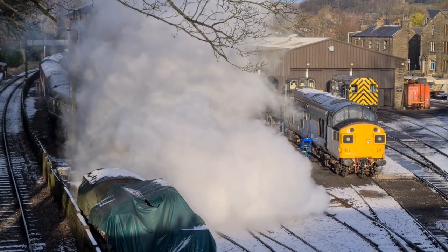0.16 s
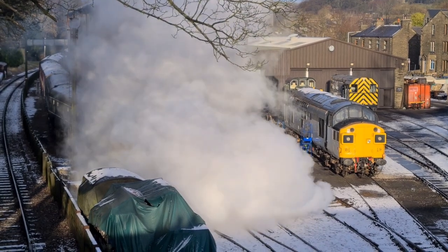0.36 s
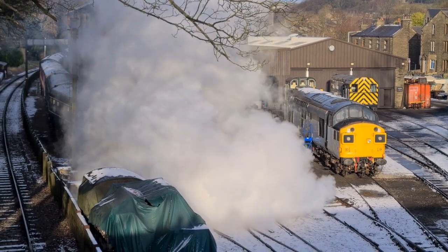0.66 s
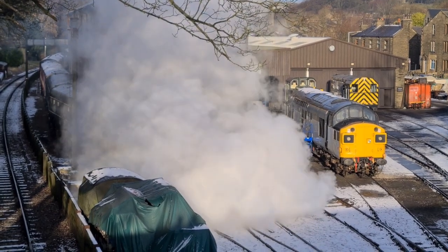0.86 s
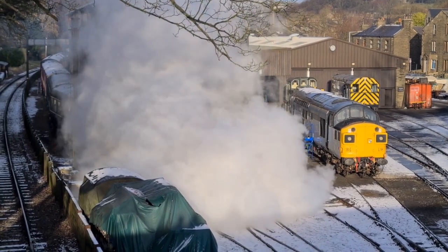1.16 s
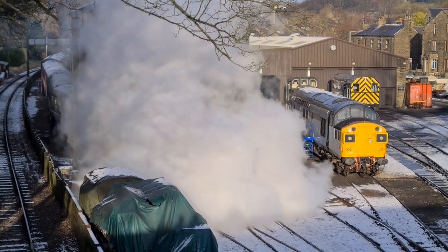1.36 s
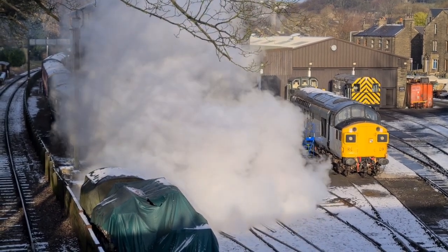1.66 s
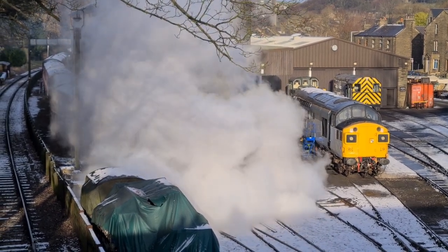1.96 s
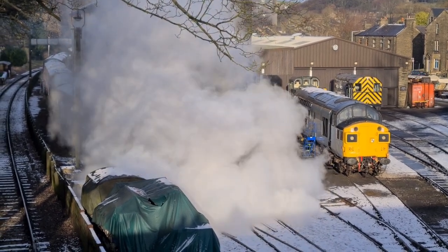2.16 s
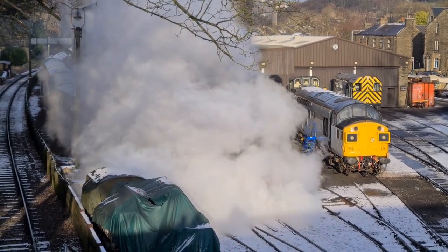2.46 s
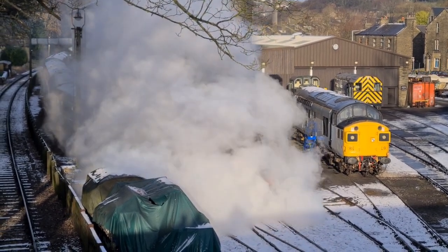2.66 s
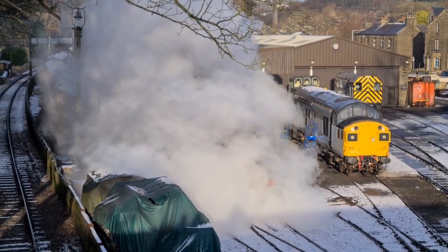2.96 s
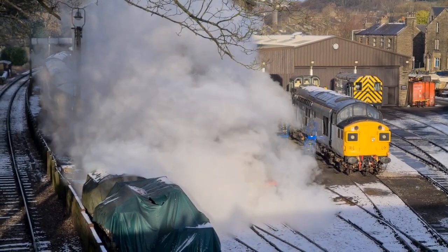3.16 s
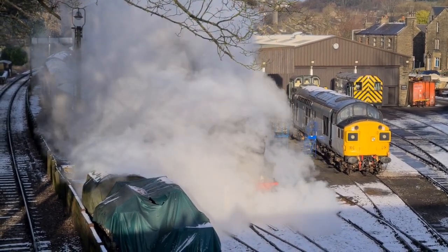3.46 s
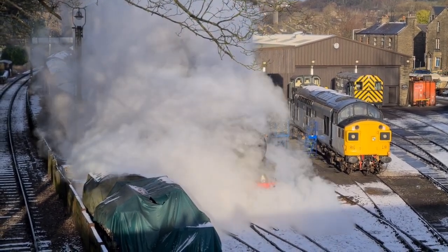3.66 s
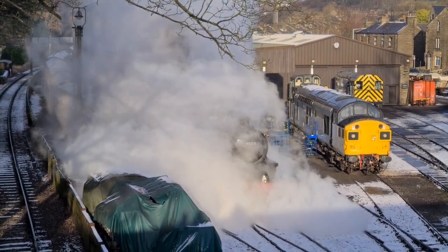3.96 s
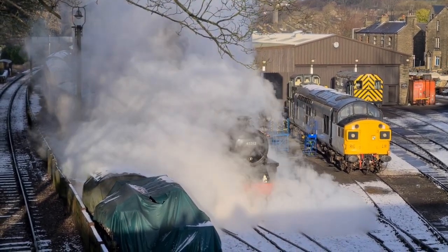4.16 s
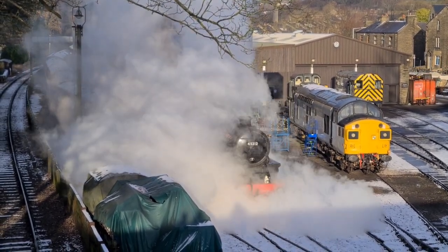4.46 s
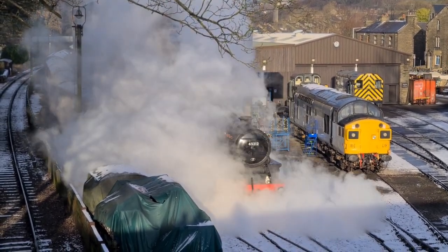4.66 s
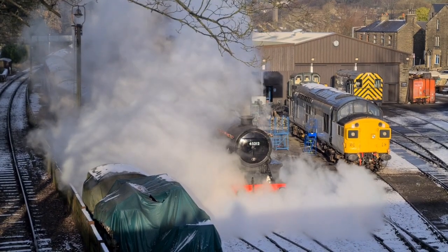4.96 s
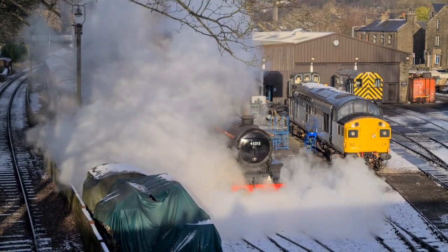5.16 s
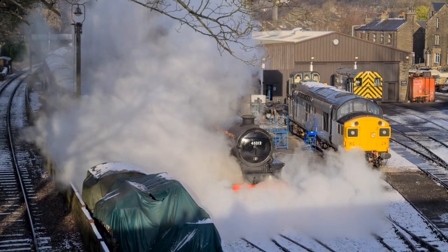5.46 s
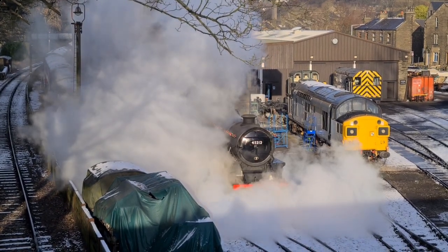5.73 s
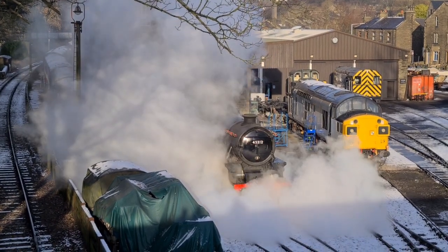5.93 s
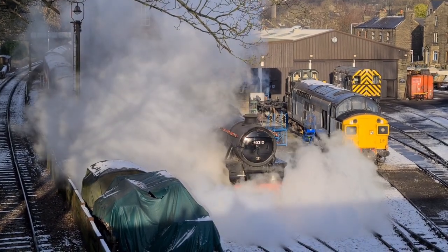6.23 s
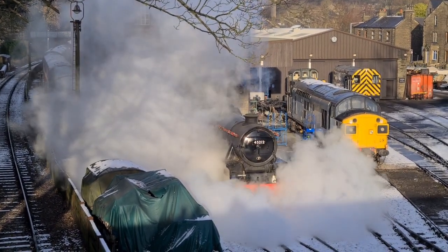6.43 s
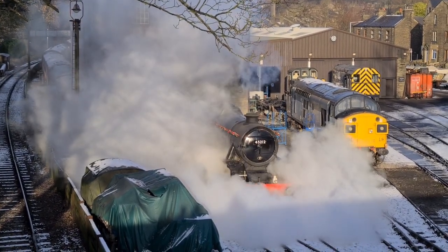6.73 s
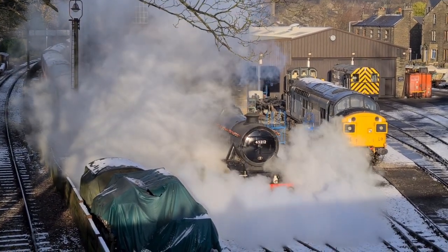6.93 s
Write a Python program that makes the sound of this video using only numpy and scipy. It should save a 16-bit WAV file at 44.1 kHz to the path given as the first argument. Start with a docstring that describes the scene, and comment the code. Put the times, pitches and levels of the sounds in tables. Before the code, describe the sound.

Rushing steam from a slowly approaching locomotive fills an outdoor railway yard, scattered by sheds and wagons. A first surge of hiss dies down, then stronger waves follow, roaring and sizzling with a slight whistling edge, and stay loud to the end. The stereo microphone also picks up a quiet low rumble and uneven wind buffeting.

```python
"""A snowy railway yard, heard through a stereo microphone as a steam locomotive creeps nearer.
The engine blows steam from its cylinder cocks in surges: the jets roar, hiss and whistle, heard
direct and scattered by sheds and wagons. Surfaces close to the microphone cut dips into the sound.
A low rumble lies below, and wind buffets the two microphone ports."""
import sys
import numpy as np
from scipy import signal
from scipy.fft import rfft, irfft
from scipy.io import wavfile
from scipy.ndimage import map_coordinates

SR = 44100
rng = np.random.default_rng(int(sys.argv[2]) if len(sys.argv) > 2 else 0)


def pcm_store(signal):
    """Save signal as 16-bit PCM."""
    levels = np.round(np.clip(np.atleast_2d(signal), -1, 1) * 32767)
    wavfile.write(sys.argv[1], SR, levels.astype(np.int16).T)


N = 312669
TIME_S = np.arange(N) / SR
HZ = np.maximum(np.fft.rfftfreq(N, 1 / SR), 1)
OPPOSED = np.array([[1], [-1]])   # plus on the left, minus on the right


def from_db(db):
    """Gain of a level in dB."""
    return 10 ** (np.asarray(db) / 20)


def unit_rms(x):
    """Scaled to rms 1."""
    return x / np.sqrt(np.mean(x ** 2) + 1e-20)


def in_time(rows):
    """Each column of a curve, read at every sample."""
    times, *columns = np.transpose(rows)
    return [np.interp(TIME_S, times, column) for column in columns]


def at_hz(points, hz):
    """A spectrum read on a log-frequency axis."""
    pitches, levels = np.transpose(points)
    return np.interp(np.log(hz), np.log(pitches), levels)


def bell(offset, width):
    """A bell curve of height 1, down to 1/e at half the width to either side."""
    return np.exp(-(2 * offset / width) ** 2)


def drift(rate_hz):
    """Slow random wander of spread 1: noise at every 40th sample, low-passed twice."""
    pole = np.exp(-80 * np.pi * rate_hz / SR)
    slow = signal.lfilter([1], [1, -2 * pole, pole * pole], rng.standard_normal(N // 40 + 2002))[2000:]
    return np.interp(np.arange(N) / 40, np.arange(len(slow)), unit_rms(slow))


def stereo_noise(spectrum, alike):
    """Coloured noise whose two channels share a part; rms 1."""
    mid, side = irfft(rfft(rng.standard_normal((2, N))) * from_db(at_hz(spectrum, HZ)), N)
    return unit_rms(np.sqrt(1 + alike) * mid + np.sqrt(1 - alike) * side * OPPOSED)


def yard_rumble(split_hz):
    """A low rumble, nearly alike in both ports; its lower and upper parts swell separately."""
    # rumble spectrum: pitch_hz, relative_db
    rumble_colour = [(22, -36), (59, -9), (100, -9), (130, -4), (270, 0.5), (365, -3.5), (505, -13),
                     (640, -9.5), (700, -9.5), (910, -24), (1540, -120)]
    # level below and above the split: time_s, lower_db, upper_db
    rumble_levels = [(0.0, -34, -34), (0.65, -29.5, -39), (0.89, -29, -37.5), (1.14, -35, -41),
                     (2.15, -37, -41), (2.8, -30.5, -35.5), (2.82, -32, -42), (2.86, -34.5, -33.5),
                     (3.83, -29, -29.5), (4.09, -34.5, -31.5), (4.23, -35, -39), (4.7, -37.5, -43),
                     (5.07, -37, -42), (6.67, -32.5, -33), (6.99, -33.5, -37), (7.09, -33, -32)]
    lower_db, upper_db = in_time(rumble_levels)
    spectrum = rfft(stereo_noise(rumble_colour, alike=0.91))
    high_pass = 1 / (1 + (split_hz / HZ) ** 8)
    lower = unit_rms(irfft(spectrum * (1 - high_pass), N))
    upper = unit_rms(irfft(spectrum * high_pass, N))
    return from_db(lower_db) * lower + from_db(upper_db) * upper


def wind_on_microphone(lump_db):
    """Lumpy, gusting wind that buffets each port mostly on its own."""
    # buffeting spectrum: pitch_hz, relative_db
    wind_colour = [(12, -40), (20, -22), (49, 4), (75, 6.5), (308, -28), (343, -27), (431, -13), (500, -18),
                   (650, -45), (1100, -120)]
    # steady wind: time_s, level_db
    breeze_levels = [(0.0, -34.5), (0.81, -28), (1.24, -32), (1.64, -37.5), (1.89, -38), (2.57, -31.5),
                     (2.8, -37.5), (3.22, -38.5), (3.67, -29), (4.29, -40.5), (5.23, -44), (7.09, -48)]
    # gusts that thump on the ports: middle_s, length_s, lift_db
    gust_thumps = [(1.407, 0.11, 7), (2.23, 0.09, 4), (2.4, 0.091, 6.5), (3.02, .1, 14), (3.52, .2, 2.5),
                   (3.777, .14, 10), (4.09, .12, 5.5), (4.23, .08, 5), (4.52, .25, 4), (5.6, .14, 18),
                   (6.25, 0.13, 9), (6.62, 0.18, 6)]
    gust_db = sum(db * bell(TIME_S - middle, length) for middle, length, db in gust_thumps)
    lumps = from_db(lump_db * np.array([drift(9.0), drift(7.9)]))
    return from_db(in_time(breeze_levels)[0] + gust_db) * lumps * stereo_noise(wind_colour, alike=0.35)


def near_surfaces():
    """Gain by [far or near engine, port, pitch]: surfaces by the microphone cut dips and add a few peaks."""
    # dips and peaks: pitch_hz, width_hz, far_left_db, far_right_db, near_left_db, near_right_db
    surface_dips = [(620, 260, 8, 12, 0, -0.5), (893, 170, -4.5, -2, -1, -1.5), (1617, 280, -1, -4, -1, -1),
                    (2910, 410, -6.5, -5, -10, -5), (3300, 236, -7, -5, -9.5, -5),
                    (3864, 650, -1, -9, -2.5, -10), (3090, 100, -7, -3, 0, -2.5),
                    (4452, 207, -9, -20, -11, -16), (5080, 100, -4, -9, -4, -3),
                    (6250, 200, -3, -3, -1, -2), (4901, 446, -2, -3.5, -6.5, -7.5),
                    (5330, 250, -1, -5, -2.5, -5.5), (5660, 292, -6, 1.5, -9.5, -2.5),
                    (5970, 200, -5, 0, -1.5, 0), (7340, 250, -3, 4, -2, -1.5),
                    (6490, 340, -8, -7.5, -1, -4), (6950, 250, 0, -1.5, -8.5, -6.5),
                    (7660, 370, -8, -16, 0, 2.5), (8200, 560, -1.5, -7, 1, -13),
                    (9060, 250, -10, -11, -6, -9), (9450, 296, -5, -8, -1, -5),
                    (9760, 440, -13, -12, -4, -5), (10960, 220, -2, 3, -11, 5.5),
                    (13100, 660, -8, -5, -2, -6), (13977, 600, -4, -13, 3, -7)]
    # balance of the ports: pitch_hz, left_over_right_db
    port_balance = [(60, -0.5), (92, -0.5), (140, -0.5), (210, -0.5), (330, -2), (500, -1.5), (770, -0.5),
                    (1170, -2.5), (1790, -4), (2740, -1.5), (4190, -3), (6410, -4.5), (9810, -0.5),
                    (15000, -8)]
    db = .5 * at_hz(port_balance, HZ) * np.tile(OPPOSED, (2, 1))
    for hz, width_hz, *depth_db in surface_dips:
        db = db + np.array(depth_db)[:, None] * bell(HZ - hz, width_hz)
    return from_db(db).reshape(2, 2, -1)


def with_yard_echoes(sound):
    """Echo paths change as the engine creeps and the steam cloud stirs: a fine, shifting ripple."""
    # echoes off ground, wagons and shed: first_delay_s, last_delay_s, wander_s, gain_db
    echo_paths = [(.0035, 0.003, 0.00024, -9.5), (.011, 0.019, 0.00049, -10.5), (.027, .022, .0008, -12.5)]
    n, out = np.arange(N), sound
    for first_s, last_s, wander_s, db in echo_paths:
        delay = SR * (first_s + (last_s - first_s) * n / N + wander_s * drift(1))
        out = out + from_db(db) * map_coordinates(sound, [n - delay], order=3, mode="wrap")
    return out


def edge_tones():
    """Steam whistles where it leaves the cocks: narrow noise that swells and fades."""
    # whistles: start_s, end_s, pitch_hz, width_hz, level_db (at the source)
    cock_whistles = [(.1, 1.5, 1430, 120, -31.5), (.4, 1.5, 2020, 120, -37), (3.5, 4.1, 2250, 120, -33),
                     (4.5, 5.5, 2330, 200, -30), (4.8, 5.5, 1450, 100, -26), (5.7, 6.5, 2020, 150, -26),
                     (6.0, 6.4, 2215, 100, -24.5), (6.599, 7.09, 1878, 100, -28)]
    out = 0
    for start, end, hz, width_hz, db in cock_whistles:
        narrow = irfft(rfft(rng.standard_normal(N)) / (1 + (2 * (HZ - hz) / width_hz) ** 2), N)
        swell = np.sin(np.pi * np.clip((TIME_S - start) / (end - start), 0, 1))
        out = out + from_db(db) * unit_rms(narrow) * swell
    return out


def spurt_lift(hz, edge_s=0.023):
    """Lift in dB of the jet band at hz: each spurt of steam opens fast, holds and shuts."""
    # spurts that brighten part of the range: start_s, length_s, middle_hz, width_octaves, lift_db
    steam_spurts = [(0.379, 0.56, 11970, 0.54, 4), (.4, 0.77, 3600, .5, 3), (4.297, 0.067, 5000, 0.9, 3),
                    (.6, .2, 6200, 0.99, 3.5), (1.08, 0.19, 6540, .6, 4), (1.42, 0.29, 10500, 0.83, 3.5),
                    (2.75, 1.15, 970, 0.55, 3.5), (2.62, 0.72, 6000, 0.35, 1.5),
                    (3.751, 0.42, 4200, 0.75, 2.5), (4.5, 0.33, 4150, 0.53, 5),
                    (4.5, 0.82, 12500, 0.65, 2.5), (5.2, 0.36, 4280, 0.77, 2), (5.3, 0.65, 750, 0.53, 3),
                    (5.85, .25, 4300, 0.53, 1.5)]
    t, lift_db = TIME_S[::64], 0
    for start, length, middle_hz, octaves, db in steam_spurts:
        gate = .5 * (np.tanh((t - start) / edge_s) - np.tanh((t - start - length) / edge_s))
        lift_db = lift_db + gate * db * bell(np.log2(hz / middle_hz), octaves)
    return np.interp(TIME_S, t, lift_db)


def steam_jets(eddy_db, flutter_db, roar_hz):
    """Turbulent jet noise (direct, scattered left, scattered right); eddies make the treble waver most."""
    # jet spectrum: pitch_hz, relative_db
    jet_colour = [(260, -31.5), (450, -20), (642, -24.5), (791, -7), (1130, -4), (2170, -0.5), (2440, -3.5),
                  (3010, -6.5), (4100, -6), (5050, -8.5), (5950, -8.5), (7210, -13), (9140, -22.5),
                  (12300, -26.5), (15600, -32.5)]
    # tint of the scattered sound: pitch_hz, gain_db
    scatter_colour = [(450, 3), (1200, 2.5), (2300, -5), (3000, 3), (6000, 3.5), (15000, 12.5)]
    # steam flow, heard as the roar: time_s, level_db
    roar_levels = [(0.0, -31), (0.08, -25.5), (0.29, -30.5), (0.35, -26), (0.79, -24), (1.95, -31),
                   (2.05, -33.5), (2.47, -31.5), (2.67, -24.5), (3.04, -20.5), (3.55, -22.5), (3.81, -16.5),
                   (4.21, -23), (4.42, -21), (4.64, -14.5), (5.01, -18), (5.37, -17), (5.61, -18.5),
                   (5.77, -13.5), (6.22, -15.5), (6.91, -20), (6.93, -17.5), (7.09, -17.5)]
    # surges of the hiss and of the sizzle above it: time_s, relative_db
    hiss_levels = [(0, -29.5), (.33, -25), (.55, -23.5), (.77, -21), (.85, -23), (1.22, -25), (1.36, -31),
                   (1.5, -28), (1.74, -35), (2.37, -39), (2.67, -28), (3.24, -22.5), (3.55, -27),
                   (3.95, -22), (4.24, -27.5), (4.33, -24), (4.44, -26), (4.6, -23), (5.09, -26),
                   (5.23, -21), (5.53, -22.5), (5.62, -24.5), (5.92, -20.5), (6.4, -22), (7.09, -19.5)]
    sizzle_levels = [(0.0, -34), (0.28, -40), (0.67, -33.5), (0.89, -37), (0.93, -31), (1.36, -42.5),
                     (1.46, -33.5), (1.68, -40), (1.78, -46.5), (2.39, -51.5), (2.86, -33.5), (3.02, -37.5),
                     (3.24, -31), (3.3, -33.5), (3.61, -36), (3.97, -29), (4.19, -38.5), (4.78, -29.5),
                     (4.91, -38), (5.23, -29.5), (5.63, -35), (5.88, -28), (7.05, -28), (7.09, -32)]
    # how far each pitch follows those surges: pitch_hz, roar_share, hiss_share, sizzle_share
    surge_shares = [(600, 0.46, 0.35, 0.01), (1050, 0.39, 0.4, 0.01), (2240, 0.98, 0.0089, 0.01),
                    (4240, 0.19, 0.88, 0.01), (6500, -0.18, 0.95, 0.16), (8950, 0.21, .05, 0.93),
                    (13000, -0.032, .05, 0.98)]
    (roar_db,), (hiss_db,), (sizzle_db,) = map(in_time, (roar_levels, hiss_levels, sizzle_levels))
    swings_db = np.array([db - db.mean() for db in (roar_db, hiss_db, sizzle_db)])
    share_hz, *shares = np.transpose(surge_shares)
    colour = from_db(at_hz(jet_colour, HZ))
    noise = rfft(rng.standard_normal((3, N))) * colour
    noise[1:] *= from_db(at_hz(scatter_colour, HZ))
    roar_octave = abs(np.log2(HZ / roar_hz)) < .5
    noise /= np.sqrt(np.mean(colour ** 2 * roar_octave))   # direct noise has rms 1 in this octave
    centres_hz = np.geomspace(400, 16000, num=18)
    band_index = np.interp(np.log(HZ), np.log(centres_hz), np.arange(len(centres_hz)))
    out, shared_eddy = 0, drift(4.0)
    for k, hz in enumerate(centres_hz):
        band = irfft(noise * np.clip(1 - abs(band_index - k), 0, 1), N)
        weights = np.array([np.interp(np.log(hz), np.log(share_hz), share) for share in shares])
        surge_db = weights @ swings_db + spurt_lift(hz)
        waver_db = eddy_db * (.5 * shared_eddy + drift(7.1)) + flutter_db * drift(33)
        waver_share = at_hz([(500, 0.41), (12000, 0.96)], hz)
        out = out + band * from_db(surge_db + waver_share * waver_db)
    return out * from_db(roar_db.mean())


def locomotive(dips_in_scatter):
    """The cylinder cocks from the microphone position, direct and scattered, as the engine draws nearer."""
    # sound scattered by sheds and wagons: time_s, over_direct_db
    scatter_levels = [(0, -2.5), (.75, -6), (1.6, -5), (2.2, -0.5), (2.8, -7), (3.3, -4.5), (4.6, -9.5),
                      (5.5, -7), (7.09, -4)]
    # phase of the direct sound between the ports: pitch_hz, left_lead_rad
    port_phase = [(0, 1), (1100, 0.23), (2100, 0.53), (2700, 0.32), (3200, -4), (3750, -4.5), (4100, -7.5),
                  (4800, -6.5), (5100, -4), (5700, -7), (6150, -4), (6500, -6), (7300, -7.5), (7900, -11),
                  (8700, -10.5), (16000, -27)]
    # the engine's approach: time_s, nearness (0 far, 1 near)
    engine_approach = [(0, 0.2), (1.8, 0), (2.6, 0.76), (4.4, 1), (7.09, 1)]
    scatter = from_db(in_time(scatter_levels)[0])
    jets = steam_jets(eddy_db=1.37, flutter_db=1.64, roar_hz=2080) / np.sqrt(1 + scatter ** 2)
    ports = near_surfaces()
    lead_rad = np.interp(HZ, *np.transpose(port_phase))
    direct = rfft(with_yard_echoes(jets[0] + edge_tones())) * ports * np.exp(.5j * lead_rad * OPPOSED)
    scattered = rfft(jets[1:] * scatter) * ports ** dips_in_scatter
    far, near = irfft(direct + scattered, N)
    nearness = in_time(engine_approach)[0]
    return (1 - nearness) * far + nearness * near


def scene():
    """Steam jets over rumble and wind."""
    steam = from_db(1.0) * locomotive(dips_in_scatter=0.75)
    return steam + yard_rumble(split_hz=248) + wind_on_microphone(lump_db=3.5)


def record(dry):
    """The highest peaks are rounded at full scale and the top treble is cut."""
    cutoff_hz = 15720
    rounded = dry / (1 + abs(dry) ** 8) ** (1 / 8)
    low_pass = signal.ellip(14, .3, 75, cutoff_hz, fs=SR, output="sos")
    return np.clip(signal.sosfilt(low_pass, rounded), -1, 1)


dry = scene()
out = record(dry)
pcm_store(out)
```